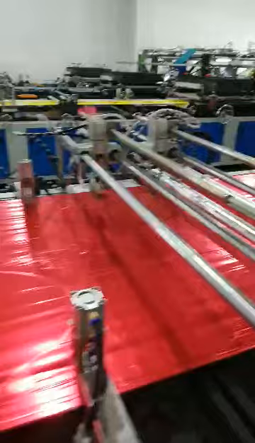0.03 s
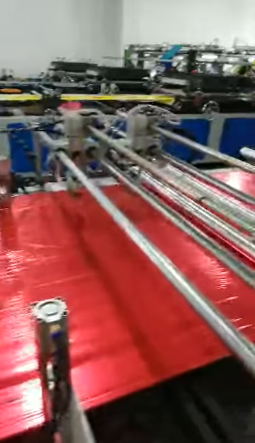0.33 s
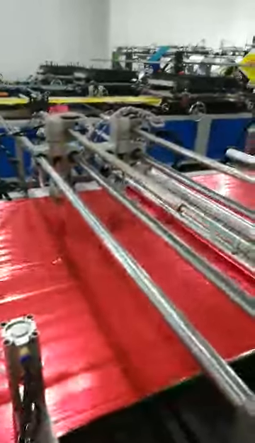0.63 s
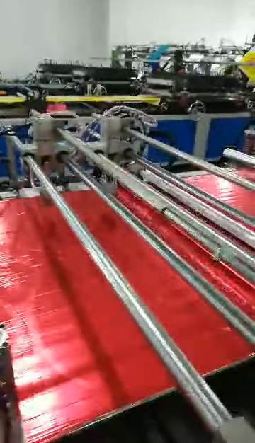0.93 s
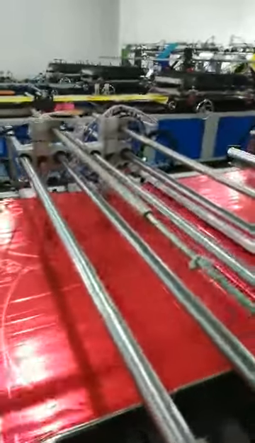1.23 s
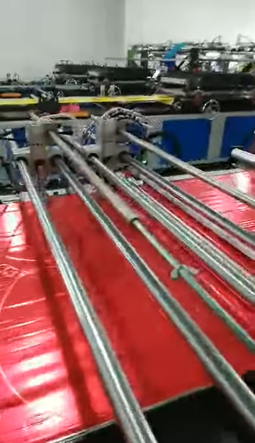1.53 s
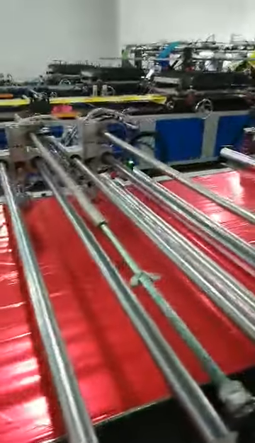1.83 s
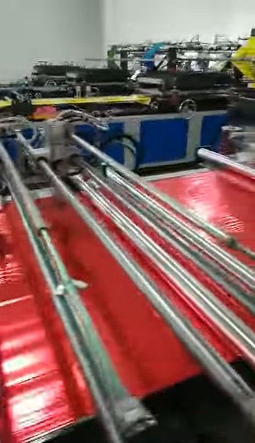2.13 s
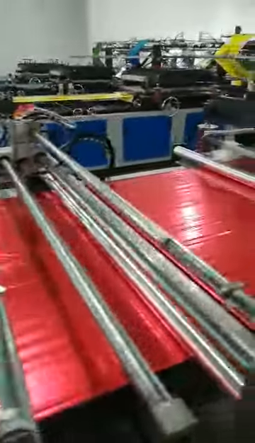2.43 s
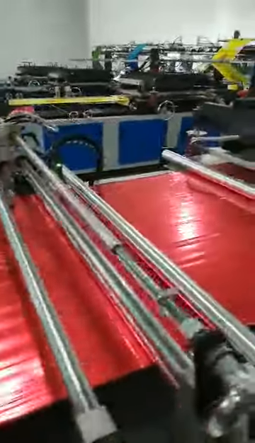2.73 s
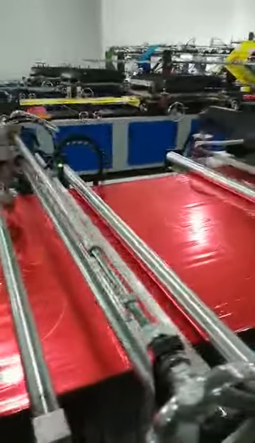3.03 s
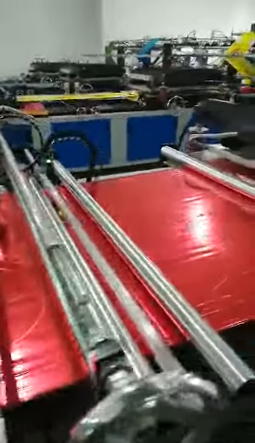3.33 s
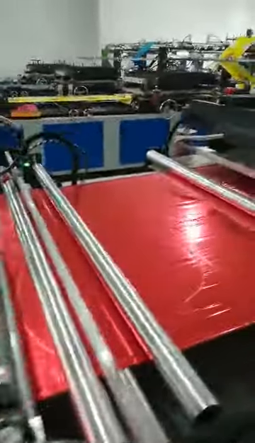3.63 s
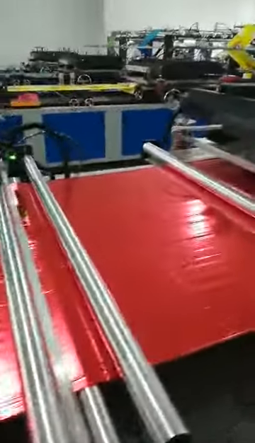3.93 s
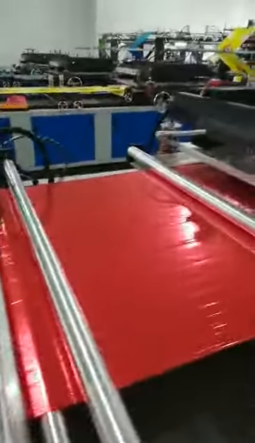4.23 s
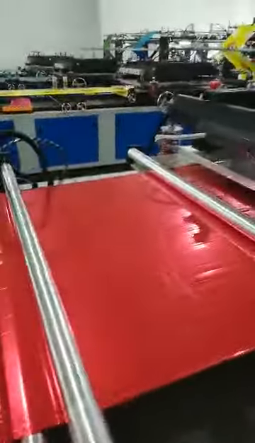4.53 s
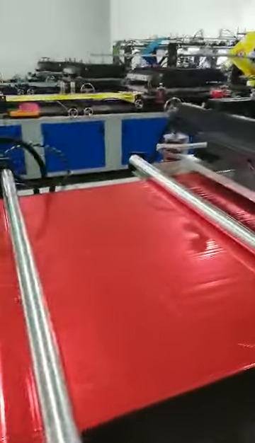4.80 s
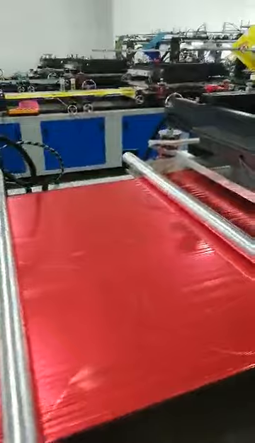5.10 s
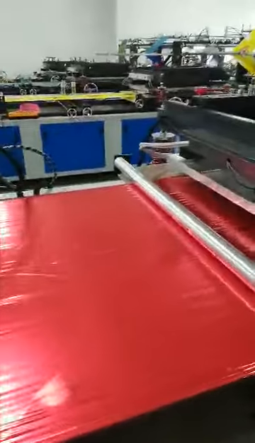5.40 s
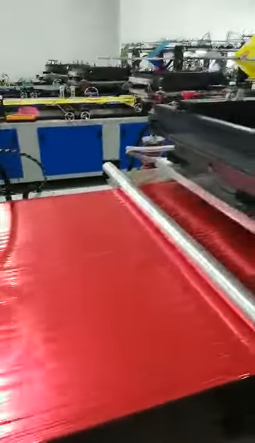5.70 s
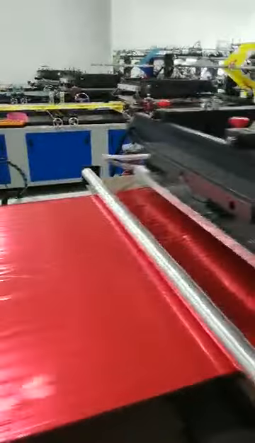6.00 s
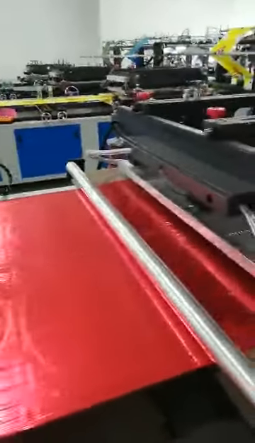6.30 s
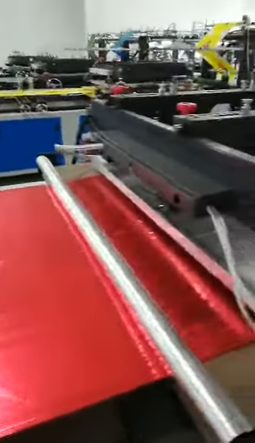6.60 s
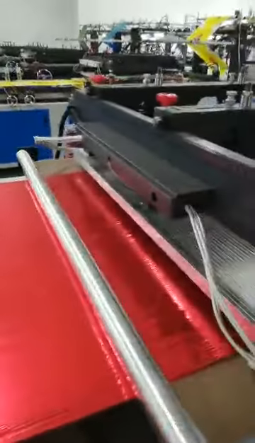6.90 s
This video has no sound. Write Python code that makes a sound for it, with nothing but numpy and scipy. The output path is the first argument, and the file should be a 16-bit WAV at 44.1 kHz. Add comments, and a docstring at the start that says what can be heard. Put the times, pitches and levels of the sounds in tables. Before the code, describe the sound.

A factory film machine hisses and pops air in cycles, with rattling thuds and thin squeals over a steady motor hum.

```python
"""Foil bag line in a factory hall

Air valves hiss through nozzles and pop their exhaust into a ringing pipe; film swishes over rollers.
About every two seconds a heavy bar drops, judders on the frame and rattles loose parts.
A dry roller and a bearing squeal by stick-slip over motor hum and the din of other machines.
The sound cuts in after a short blip."""
import sys
import numpy as np
from scipy import signal
from scipy.fft import rfft, irfft, next_fast_len
from scipy.io import wavfile
from scipy.ndimage import map_coordinates

SR = 44100
rng = np.random.default_rng(int(sys.argv[2]) if len(sys.argv) > 2 else 0)


def master_out(mix):
    """Clip the mix to full scale and print it as 16-bit PCM to the path in sys.argv[1]."""
    frames = np.transpose(np.atleast_2d(mix))
    ceiling = np.clip(frames, -1, 1)
    pcm = np.round(ceiling * 32767).astype(np.int16)
    wavfile.write(sys.argv[1], SR, pcm)


N = 315315
T = np.arange(N) / SR


def amp(db):
    """Decibels to gain."""
    return 10 ** (np.asarray(db) / 20)


def unit(x):
    """Scale to rms 1."""
    return x / np.sqrt(np.mean(x ** 2) + 1e-20)


def along(points, hz):
    """Interpolate (f/Hz, value) points on a log axis."""
    f, value = np.transpose(points)
    return np.interp(np.log(hz + 1), np.log(f + 1), value)


def swell(start_s, db, rise_s, hold_s, t60_s):
    """Gain of a burst that rises, holds and dies away."""
    alive = slice(*np.searchsorted(T, [start_s, start_s + rise_s + hold_s + 2 * t60_s]))
    age_s = T[alive] - start_s
    decay_db = 60 * np.maximum(age_s - rise_s - hold_s, 0) / t60_s
    gain = np.zeros(N)
    gain[alive] = amp(db - decay_db) * np.minimum(age_s / rise_s, 1)
    return gain


def wobble(rate_hz):
    """Smooth curve through random knots."""
    knots = rng.standard_normal(int(N * rate_hz / SR) + 4)
    return np.interp(T, T[::32], map_coordinates(knots, [T[::32] * rate_hz]))


def filtered(x, response):
    """Apply a gain given as a function of f/Hz."""
    size = next_fast_len(N + 8192)
    return irfft(rfft(x, size) * response(np.fft.rfftfreq(size, 1 / SR)), size)[..., :N]


def coloured(x, spectrum):
    """Shape x by a spectrum, at rms 1."""
    return unit(filtered(x, lambda hz: amp(along(spectrum, hz))))


def noise(spectrum):
    """Two independent noises of one spectrum."""
    return coloured(rng.standard_normal((2, N)), spectrum)


def narrow(centre_hz, half_width_hz):
    """Two independent noises through one resonance of peak gain 1."""
    return filtered(rng.standard_normal((2, N)), lambda hz: 1 / (1 + ((hz - centre_hz) / half_width_hz) ** 2))


def panned(gain, pan_db):
    """Split a gain into left and right, pan_db apart."""
    return amp([[pan_db / 2], [-pan_db / 2]]) * gain


def struck(blows, modes, crack, attack_s):
    """Each blow (t/s, level/dB) cracks briefly and rings the modes at new strengths."""
    out, t = np.zeros((2, N + SR)), np.arange(SR // 3) / SR
    hz, db, t60_s = np.transpose(modes)[..., None]
    for start_s, peak_db in blows:
        size, detune, phase = rng.standard_normal((3, 2, len(modes), 1))
        cycles = hz * (1 + 0.011 * detune) * t + phase
        ring = np.sum(amp(db + 2 * size - 60 * t / t60_s) * np.sin(2 * np.pi * cycles), axis=1)
        click = crack * amp(-60 * t / 0.0034) * rng.standard_normal((2, len(t)))
        hit = ring * (1 - np.exp(-t / attack_s)) + click
        out[:, round(start_s * SR):][:, :len(t)] += amp(peak_db) * hit / np.abs(hit).max()
    return out[:, :N]


def hall(x, wet_db, t60_s):
    """Add the hall's diffuse reverberation."""
    t = np.arange(SR) / SR
    tail = rng.standard_normal((2, SR)) * amp(-60 * t / t60_s) * (1 - np.exp(-t / 0.0047))
    return x + amp(wet_db) * signal.fftconvolve(x, tail / np.linalg.norm(tail[0]), axes=1)[:, :N]


def steelwork(x, echo_db, count=24):
    """Echoes from nearby rollers and panels give the treble a metallic ripple."""
    delay_s = rng.uniform(0.002, 0.03, count)
    strength = rng.standard_normal((2, count)) / np.sqrt(count)
    echoes = np.zeros((2, SR // 8))
    echoes[:, (delay_s * SR).astype(int)] = amp(echo_db) * strength
    treble = signal.sosfilt(signal.butter(2, 1500, "high", fs=SR, output="sos"), x)
    return (x + signal.fftconvolve(treble, echoes, axes=1)[:, :N]) / np.sqrt(1 + amp(echo_db) ** 2)


def squeal(gain, pitch_hz, waver_hz, wet_db):
    """Stick-slip friction sings on one wavering mode."""
    phase = 2 * np.pi * np.cumsum(pitch_hz + waver_hz * wobble(40)) / SR
    return hall(gain * np.sqrt(2) * np.sin(phase), wet_db, t60_s=0.5)


# Hall noise: f/Hz, level/dB
DIN_SPECTRUM = [(20, -14), (40, -1.5), (70, 1), (110, 1), (160, 2), (380, -6), (520, -15), (1000, -13.5),
                (2250, -13.5), (2850, -18), (4400, -13.5), (5400, -15), (7200, -11), (10500, -33.5),
                (15500, -42)]

def din():
    """Other machines rumble and hiss."""
    level_db = -29.5 + 0.28 * wobble(5.2) + 1.23 * wobble(30)
    return amp(level_db) * steelwork(noise(DIN_SPECTRUM), echo_db=-8.5)


# Hum: f/Hz, level/dB
MOTOR_TONES = [(72, -46.5), (205, -52), (308, -47.5), (355, -55)]

def motors():
    """Motors hum, unsteady in level and phase."""
    hum = np.zeros((2, N))
    for hz, db in MOTOR_TONES:
        gain = amp(db + 1.4 * wobble(6.7))
        drift_rad = np.array([wobble(9), wobble(11)])
        hum += gain * np.sin(2 * np.pi * hz * T + drift_rad)
    return hum


# Feed cycle: t/s, rattle/dB, outward half/dB, return half/dB
FEED_STROKES = [(-0.106, -29, -11.5, -1), (1.954, -25.5, 0.5, -0.5), (4.019, -23.5, 0.5, -1.5),
                (6.068, -24, 2.5, -3)]
# Loose parts: f/Hz, level/dB
RATTLE_SPECTRUM = [(60, -16.5), (170, -1), (300, 1), (450, -3.5), (650, -8), (900, -12), (1300, -10),
                   (2200, -13.5), (3200, -20.5), (8000, -50)]

def rattle(contacts_per_s=4000):
    """The dropping bar shakes loose parts at the start of each stroke."""
    contacts = (rng.random((2, N)) < contacts_per_s / SR) * rng.standard_normal((2, N))
    shaking = sum(swell(s, db, rise_s=0.029, hold_s=0.094, t60_s=1.23) for s, db, *_ in FEED_STROKES)
    return amp(1) * shaking * coloured(hall(contacts, wet_db=3.5, t60_s=0.32), RATTLE_SPECTRUM)


def each_stroke(delay_s, db, *shape, return_s=0.9):
    """Gain of a burst repeated at the same point of every feed stroke."""
    return sum(swell(s + delay_s, db + (out_db if delay_s < return_s else back_db), *shape)
               for s, _, out_db, back_db in FEED_STROKES)


# Blasts per stroke: delay/s, hiss/dB, rush/dB, rise/s, hold/s, t60/s
FEED_BLASTS = [(0.002, -35, -32.5, .014, .025, 0.66), (.355, -34, -38.5, .075, .12, 1.4),
               (0.975, -32.5, -43.5, .035, .022, 0.93), (1.254, -35, -40, 0.036, .085, 2.4)]

def feed_valves():
    """Feed valves blow in every stroke: gains of nozzle hiss and exhaust rush."""
    hiss = sum(each_stroke(delay_s, db, *shape) for delay_s, db, _, *shape in FEED_BLASTS)
    rush = sum(each_stroke(delay_s, db, *shape) for delay_s, _, db, *shape in FEED_BLASTS)
    return np.array([hiss, rush])


# Nozzle hiss: f/Hz, level/dB
NOZZLE_SPECTRUM = [(800, -43), (2500, -14), (4200, -7.5), (5400, -9), (6300, 2), (7200, 1.5), (8100, -1.5),
                   (9500, -10), (11500, -17), (15500, -24)]
# Exhaust rush: f/Hz, level/dB
EXHAUST_SPECTRUM = [(500, -34), (800, -25.5), (1300, 6.5), (2500, 3.5), (5000, 2), (8000, -6), (15000, -39)]
# Exhaust pipe: f/Hz, width/Hz, level/dB
PIPE_MODES = [(1117, 260, -10), (1730, 420, 0), (2290, 500, -5), (3170, 280, -3), (4220, 600, -8.5),
              (4600, 420, -2.5)]

def air_jets(hiss, rush):
    """Turbulent air leaves by a narrow nozzle and a ringing pipe."""
    punch_s, *_, punch_upper_db = np.transpose(PUNCH_CYCLES)
    upper_db = np.interp(T, punch_s, punch_upper_db)
    modes = sum(amp(db + upper_db * (hz > 2700)) * narrow(hz, width_hz / 2)
                for hz, width_hz, db in PIPE_MODES)
    pipe = unit(unit(modes) + amp(-2) * noise(EXHAUST_SPECTRUM))
    turbulence = amp(1 + 0.51 * wobble(60) + 0.31 * wobble(300))
    return turbulence * steelwork(hiss * noise(NOZZLE_SPECTRUM) + rush * pipe, echo_db=-7)


# Two pulls per stroke: delay/s, level/dB, rise/s, hold/s, t60/s
FILM_PULLS = [(0.4, -34, 0.11, 0.085, 1.3), (1.263, -34.5, .05, 0.099, 1.2)]
# Peel in the second pull: delay/s, level/dB, rise/s, hold/s, t60/s
FILM_PEEL = (1.297, -31.5, 0.04, 0.07, 0.45)
# Swish: f/Hz, level/dB
FILM_SPECTRUM = [(700, -22), (1400, -3), (2200, -4.5), (3200, -3), (4300, 2), (5500, -8), (7300, 2.5),
                 (8400, -0.5), (9300, -1.5), (10100, -6.5), (11000, -14.5), (15500, -26.5)]

def film():
    """Film swishes over the rollers and peels off one with a high sizzle."""
    pulling = sum(each_stroke(*pull) for pull in FILM_PULLS)
    swish = pulling * amp(4 + 0.73 * wobble(200)) * noise(FILM_SPECTRUM)
    sizzle_hz_db = [(7000, -25), (8700, 0), (9400, -1), (10200, -6), (11200, -22), (15000, -25)]
    return swish + each_stroke(*FILM_PEEL) * noise(sizzle_hz_db)


# Swell crests: t/s, level/dB, L-R/dB
BEARING_CRESTS = [(1.56, -40, 15), (2.0, -45, 0), (3.8, -44, -6), (5.48, -36, 3), (6.03, -37, -15.5)]

def bearing(fade_db_per_s=66, rounding_s=0.049):
    """A bearing's thin note swells and fades evenly around each crest."""
    gain = np.zeros((2, N))
    for crest_s, db, pan_db in BEARING_CRESTS:
        away_s = np.hypot(T - crest_s, rounding_s) - rounding_s
        gain += panned(amp(db - fade_db_per_s * away_s), pan_db)
    return squeal(gain * amp(-1 + 1.6 * wobble(45)), pitch_hz=2638, waver_hz=6.5, wet_db=-5)


# Punch exhaust: t/s, pop/dB, rush/dB, rush hold/s, rush t60/s, hiss/dB, upper pipe modes/dB
PUNCH_CYCLES = [(1.697, -25.5, -25, .15, 1.5, -22, 3.5), (3.5086, -22.5, -26, 0.2, 2.1, -21.5, 2.5),
                (5.274, -19.5, -26, 0.14, 2.03, -21.5, 1), (6.978, -18.5, -27.5, .13, 1.5, -22, -2.5)]
# Nozzle, once before and three times after a punch: delay/s, level/dB re hiss, rise/s, hold/s, t60/s
PUNCH_BLASTS = [(-.159, -.5, 0.053, 0.043, 0.73), (0.031, .5, .022, 0.04, 0.83),
                (0.327, -13, 0.031, .07, 0.49), (.58, -16, .04, 0.043, .9)]

def punch_valves(dump_rise_s=0.0041, dump_hiss_db=-10, nozzle_rush_db=-12.5):
    """The punch cylinder dumps its air on its own, faster cycle: gains of hiss and rush."""
    dump = sum(swell(s, db, dump_rise_s, hold_s, t60_s) for s, _, db, hold_s, t60_s, *_ in PUNCH_CYCLES)
    nozzle = sum(swell(s + delay_s, hiss_db + db, *shape)
                 for s, *_, hiss_db, _ in PUNCH_CYCLES for delay_s, db, *shape in PUNCH_BLASTS)
    return np.array([nozzle + amp(dump_hiss_db) * dump, dump + amp(nozzle_rush_db) * nozzle])


# Chirps: t/s, level/dB, hold/s, L-R/dB
ROLLER_CHIRPS = [(1.544, -22, 0.017, 11), (1.685, -27, .012, -13), (5.584, -22, 0.032, 0.5),
                 (5.684, -22, 0.017, -1), (5.746, -26, .01, -4), (5.795, -31.5, .01, -9),
                 (5.87, -32, 0.035, 0), (5.97, -41, 0.027, 4)]

def roller(rise_s=0.026, t60_s=0.18):
    """A dry roller catches in a stutter of short chirps."""
    gain = sum(panned(swell(s, db, rise_s, hold_s, t60_s), pan_db)
               for s, db, hold_s, pan_db in ROLLER_CHIRPS)
    return squeal(gain * amp(1.2 * wobble(120)), pitch_hz=4910, waver_hz=15, wet_db=-7)


# Valve port: f/Hz, level/dB, t60/s
PORT_MODES = [(1172, 2.5, 0.043), (1283, -5, 0.055), (970, -5, 0.044), (1620, -4.5, 0.048),
              (3150, -11, 0.028)]

def exhaust_pops(rebound_s=0.025, rebound_db=-6):
    """The punch's exhaust port opens with a ringing pop; the spool rebounds once on its seat."""
    blows = []
    for s, db, *_ in PUNCH_CYCLES:
        blows += [(s, db), (s + rebound_s, db + rebound_db)]
    ring = struck(blows, PORT_MODES, crack=0.37, attack_s=0.0005)
    radiation_hz_db = [(700, -12), (1050, 0.5), (3500, -1), (8000, -16)]
    pops = filtered(ring, lambda hz: amp(along(radiation_hz_db, hz)))
    return amp(8) * hall(pops, wet_db=-13, t60_s=0.39)


# Guide travel: t/s, level/dB, hold/s
GUIDE_SLIDES = [(1.96, -24.5, 0.078), (2.324, -38.5, 0.31), (3.772, -24, 0.04), (4.778, -43, .22),
                (5.44, -28, .055), (5.845, -36, .06)]
# Sliding noise: f/Hz, level/dB
GUIDE_SPECTRUM = [(400, -24), (850, -3), (1050, -4), (1450, 6), (1850, 4.5), (2400, 3.5), (2900, -6.5),
                  (7000, -29)]

def guides(rise_s=0.037, t60_s=0.79):
    """Guides slide with a fine grain."""
    travel = sum(swell(s, db, rise_s, hold_s, t60_s) for s, db, hold_s in GUIDE_SLIDES)
    return travel * amp(1.1 * wobble(150)) * noise(GUIDE_SPECTRUM)


# Long runs and short spurts: t/s, level/dB, hold/s, t60/s
DRIVE_RUNS = [(1.96, -35, 0.46, 1.3), (3.792, -33, 0.054, 0.56), (4, -33, .08, 2.4), (4.83, -42.5, .06, 1),
              (5.127, -34, 0.054, .9), (6.06, -34, 0.21, 3.4)]

def drive(rise_s=0.045):
    """The drive whines in two narrow bands as it works."""
    effort = sum(swell(s, db, rise_s, hold_s, t60_s) for s, db, hold_s, t60_s in DRIVE_RUNS)
    whine = unit(narrow(805, half_width_hz=34) + 0.74 * narrow(877, half_width_hz=58))
    return amp(-3.5) * effort * whine


# Bar on frame: t/s, level/dB, first judder/dB, flight before judder/s
BAR_LANDINGS = [(1.984, -16.5, -17, 0.23), (4.062, -11, -14, 0.077), (6.114, -15.5, -16, .15)]
# Frame: f/Hz, level/dB, t60/s
FRAME_MODES = [(165, -2.5, 0.22), (209, 1, 0.14), (249.7, 0.5, 0.17), (304.7, 1, 0.22), (365, -2.5, 0.16),
               (436, -8, 0.094), (633, -16, 0.046), (776, -18, 0.045)]

def bar(far_end_s=0.028, far_end_db=-1, judder_s=0.074, loss_db=1.5, rest_s=0.32):
    """The bar thuds on the frame, one end then the other, jumps and judders to rest."""
    blows = []
    for s, db, judder_db, flight_s in BAR_LANDINGS:
        blows += [(s, db), (s + far_end_s, db + far_end_db)]
        for bounce, delay_s in enumerate(np.arange(flight_s, rest_s, judder_s)):
            blows.append((s + delay_s, judder_db - bounce * loss_db))
    thuds = struck(blows, FRAME_MODES, crack=0.05, attack_s=0.0021)
    return amp(-1) * hall(thuds, wet_db=-3, t60_s=0.43)


# Clacks: t/s, level/dB
LINKAGE_CLACKS = [(4.836, -28), (4.889, -25), (5.021, -30), (5.084, -40)]
# Linkage: f/Hz, level/dB, t60/s
LINKAGE_MODES = [(490, -1, .06), (615, -1, .06), (720, -2.5, .05), (900, -6, .05), (1450, -8, .04)]

def linkage():
    """The bar's linkage clacks as it takes up play."""
    clacks = struck(LINKAGE_CLACKS, LINKAGE_MODES, crack=0.2, attack_s=0.0018)
    return amp(-4) * hall(clacks, wet_db=2, t60_s=0.4)


# Left-right likeness: f/Hz, correlation
STEREO_CORRELATION = [(60, .993), (170, .96), (320, .68), (450, 0), (620, -.45), (900, -.15), (1200, .15),
                      (1700, .22), (2300, -.22), (3000, 0), (6200, .05), (7000, .9), (15000, .9)]
# Balance: f/Hz, L-R/dB
STEREO_BALANCE = [(60, 0), (110, 0.0), (200, 0.0), (380, -2.5), (700, 1), (1290, -3), (2380, -5),
                  (4400, -3), (8120, -3.5), (15000, 1.5)]

def spread(mid_side):
    """Mid and side to left and right; width and balance vary with frequency."""
    def width(hz):
        likeness = along(STEREO_CORRELATION, hz)
        return np.array([np.ones_like(hz), np.sqrt((1 - likeness) / (1 + likeness))])

    mid, side = filtered(mid_side, width)
    left_right = np.array([mid + side, mid - side])
    return filtered(left_right, lambda hz: amp(np.outer([0.5, -0.5], along(STEREO_BALANCE, hz))))


def scene():
    """The machines spread in stereo, with the panned squeals on top."""
    hiss, rush = feed_valves() + punch_valves()
    background = din() + motors() + drive()
    air = air_jets(hiss, rush) + exhaust_pops()
    sliding = steelwork(film() + guides(), echo_db=-3)
    impacts = rattle() + bar() + linkage()
    return spread(background + air + sliding + impacts) + roller() + bearing()


def gain_control(x, knee_db, slope, smoothing_s):
    """The gain sinks as the smoothed power rises through a soft knee."""
    pole = np.exp(-1 / (smoothing_s * SR))
    power = signal.lfilter([1 - pole], [1, -pole], np.mean(x ** 2, axis=0))
    return x * (1 + power / amp(knee_db) ** 2) ** (-slope / 2)


# Blip, silence, then on: t/s, gain
GATE = [(.437, 0), (.45, 1), (.4585, 1), (.459, 0), (.859, 0), (.86, 1)]

def record(dry, top_hz=15800, edge_hz=400):
    """Loud blasts duck the mix; it is gated in and band-limited."""
    ducked = gain_control(dry, knee_db=-19, slope=0.47, smoothing_s=0.035)
    gated = ducked * np.interp(T, *np.transpose(GATE))
    return filtered(gated, lambda hz: np.clip((top_hz - hz) / edge_hz + 0.5, 0, 1) ** 2)


dry = scene()
out = record(dry)
master_out(out)
```